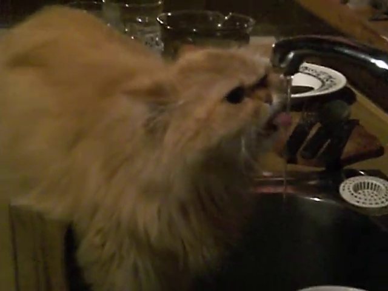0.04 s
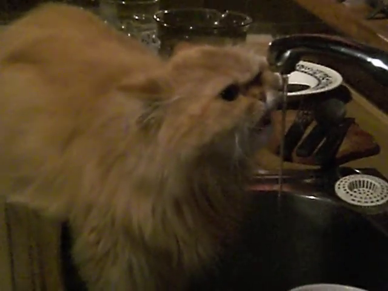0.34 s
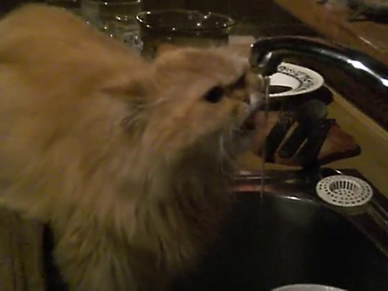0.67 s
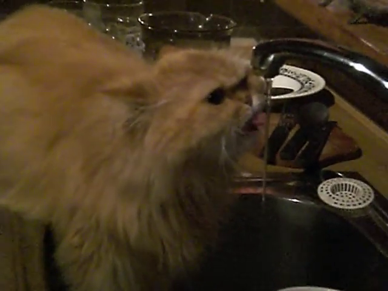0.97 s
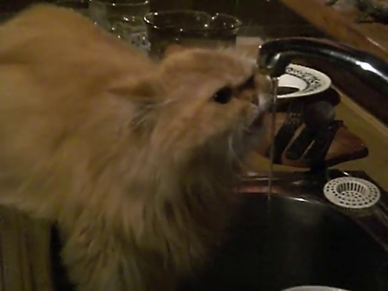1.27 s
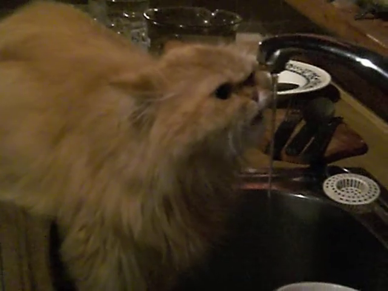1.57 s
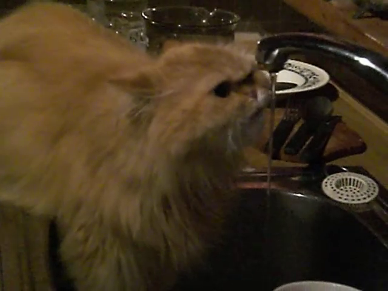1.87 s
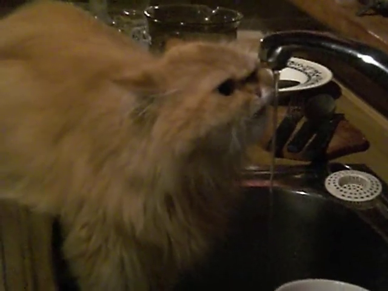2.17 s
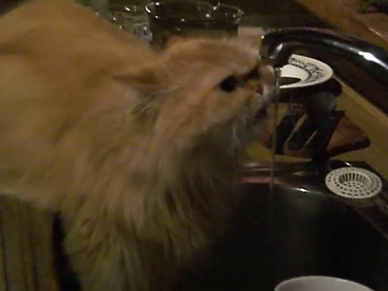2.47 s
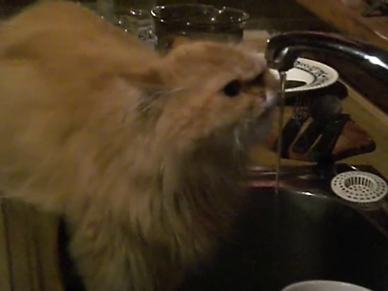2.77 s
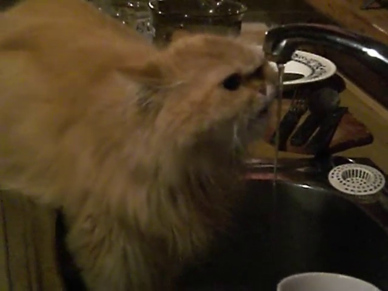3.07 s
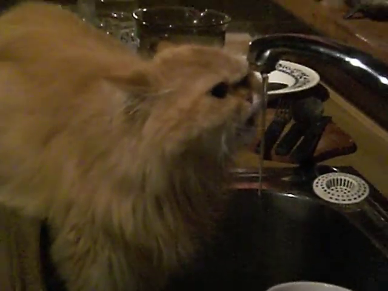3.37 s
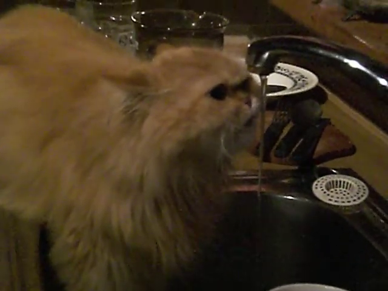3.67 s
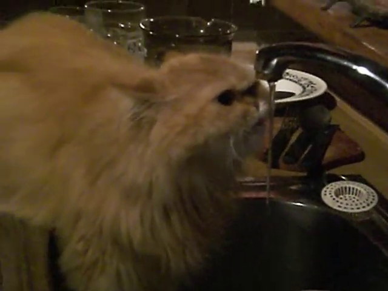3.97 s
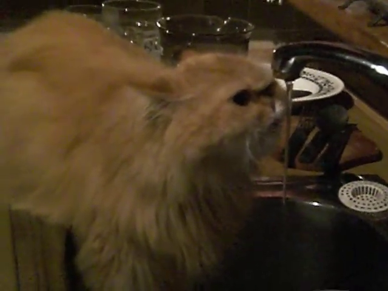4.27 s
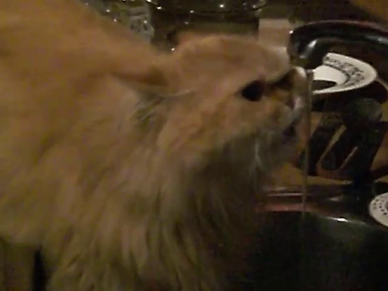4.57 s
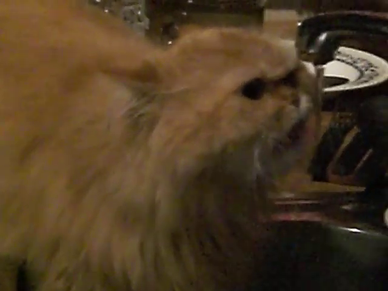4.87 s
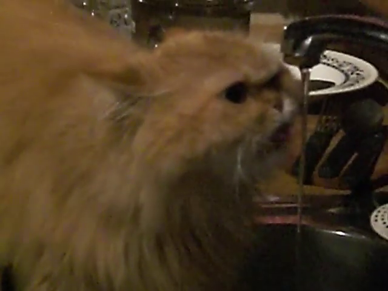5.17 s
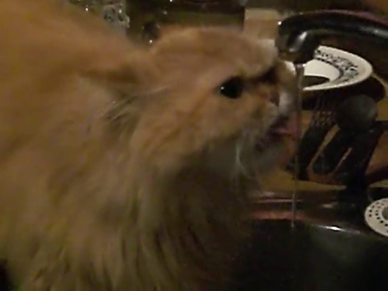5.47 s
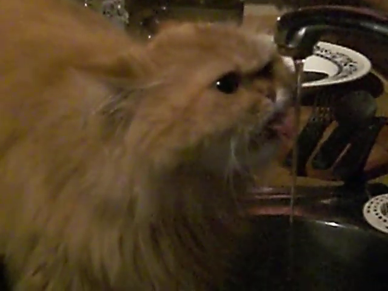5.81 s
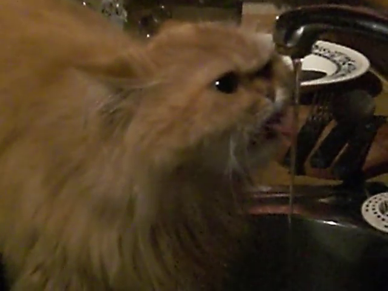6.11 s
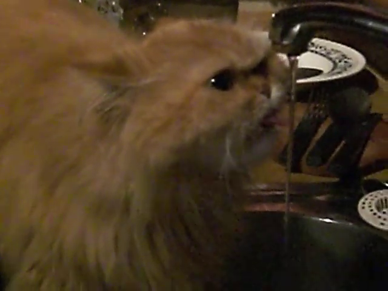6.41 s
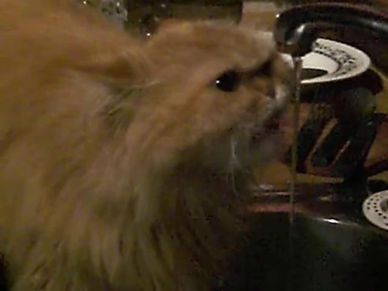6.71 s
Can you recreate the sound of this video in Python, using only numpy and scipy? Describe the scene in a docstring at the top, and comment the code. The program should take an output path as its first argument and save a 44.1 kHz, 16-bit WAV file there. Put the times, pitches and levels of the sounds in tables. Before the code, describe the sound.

A thin stream of tap water hisses into a steel sink with scattered drips, a few close clicks and a faint motor hum.

```python
"""Thin stream in a steel sink

At a kitchen sink, on a hand-held camera's microphone. The barely open tap hisses through the spout's
resonances, its stream patters on the basin and stray drops splash; a cat drinks from it unheard.
A motor hums in the room behind. Right at the microphone a finger clicks the camera, amid soft bumps."""
import sys
import numpy as np
from scipy import signal
from scipy.fft import rfft, irfft, next_fast_len
from scipy.io import wavfile
from scipy.ndimage import map_coordinates

SR = 44100
rng = np.random.default_rng(int(sys.argv[2]) if len(sys.argv) > 2 else 0)


def persist_wave(psi):
    """Save psi, clipped to +-1, as 16-bit WAV."""
    counts = np.round(np.clip(psi, -1, 1) * 32767).astype(np.int16)
    wavfile.write(sys.argv[1], SR, np.atleast_2d(counts).T)


N = 302085


def amp(db):
    """Decibels to gain."""
    return 10 ** (np.asarray(db) / 20)


def unit(x):
    """x at rms 1."""
    return x / np.sqrt(np.mean(x ** 2) + 1e-20)


def shape(points, hz):
    """Gain of (Hz, dB) points joined on a log axis."""
    point_hz, db = np.transpose(points)
    return amp(np.interp(np.log(hz + 1), np.log(point_hz), db))


def filtered(x, response):
    """x through a gain that depends on frequency."""
    size = next_fast_len(len(x) + 4096)
    return irfft(rfft(x, size) * response(np.fft.rfftfreq(size, 1 / SR)), size)[:len(x)]


def band(hz, centre_hz, width_hz):
    """Gain of one resonance."""
    return hz * width_hz / np.hypot(centre_hz ** 2 - hz ** 2, hz * width_hz)


def noise(response, size=N):
    """Coloured noise of rms 1."""
    return unit(filtered(rng.standard_normal(size), response))


def wobble(rate):
    """A smooth random curve, rate knots a second."""
    knots = rng.standard_normal(int(N * rate / SR) + 4)
    return map_coordinates(knots, [np.arange(N) * rate / SR])


def impacts(rate, scatter_db):
    """Random impulses of scattered size, rate a second, at rms 1."""
    hits = (rng.random(N) < rate / SR) * rng.choice([-1, 1], N)
    return unit(hits * amp(scatter_db * rng.standard_normal(N)))


def add(track, s, sound):
    """Mix a sound into the track at time s."""
    part = track[max(round(s * SR), 0):][:len(sound)]
    part += sound[:len(part)]


# Motor tones in the background: (frequency [Hz], level [dB])
MOTOR_TONES = [(48.5, -77), (97, -65.5), (145.8, -67), (196, -74), (294, -73.5), (343, -74), (538.5, -78)]
# The kitchen's room tone: (frequency [Hz], relative level [dB])
ROOM_TONE = [(20, -7), (45, 0), (75, 1), (100, 4.5), (160, -1), (250, -4.5), (400, -3.5), (550, -6.5),
             (1500, -11.5), (4000, -20)]


def room():
    """Behind the sink's sounds, a slightly unsteady motor hums over a low murmur of air."""
    t = np.arange(N) / SR
    hum = np.zeros(N)
    for hz, db in MOTOR_TONES:
        peak = np.sqrt(2) * amp(db + 1.16 * wobble(2.87))
        hum += peak * np.sin(2 * np.pi * hz * t + 0.33 * wobble(3.99))
    return hum + amp(-57.5) * noise(lambda hz: shape(ROOM_TONE, hz))


# Soft bumps at the microphone: (time [s], level [dB], centre [Hz], half-length [s])
SOFT_BUMPS = [(0.906, -59, 320, 0.1), (5.082, -49, 865, 0.018), (5.74, -53, 281, 0.03),
              (6.086, -57, 190, 0.035), (6.36, -55, 276, 0.022), (6.68, -51.5, 1900, .008)]


def bumps():
    """Dull contacts swell and fade without an edge."""
    out, t = np.zeros(N), np.arange(N) / SR
    for s, db, centre, half_length in SOFT_BUMPS:
        swell = amp(db) * np.exp(-((t - s) / half_length) ** 2)
        out += swell * noise(lambda hz: band(hz, centre, 0.9 * centre) ** 2)
    return out


# Modes of the plastic housing around the microphone: (frequency [Hz], relative level [dB], t60 [s])
HOUSING_MODES = [(734, -1.5, 0.015), (1105, -3, 0.018), (1580, -2, 0.005), (2240, -5.5, 0.0076),
                 (3225, -11.5, 0.0089), (4490, -4, 0.0059), (5900, -26, .006), (9600, -11.5, 0.0077)]
# Finger on the camera: (time [s], ring gain [dB], tilt [dB/octave], contact cut-off [Hz], thump [dB])
FINGER_CLICKS = [(1.4222, -27, 6.5, 3700, -29), (1.6985, -19, 4.5, 2340, -20), (4.288, -34, 6, 6950, -37),
                 (4.7485, -15.5, 0.5, 9000, -25)]


def camera_clicks():
    """A finger snaps the zoom lever; the housing rings at the microphone, with no room around it."""
    out, t = np.zeros(N), np.arange(SR // 25) / SR
    for s, ring_db, tilt_db, contact_hz, thump_db in FINGER_CLICKS:
        ring = np.zeros(len(t))
        for k, (hz, db, t60) in enumerate(HOUSING_MODES):
            # a soft fingertip spares the modes above its cut-off
            push = amp(tilt_db * np.log2(hz / 1000)) / np.hypot(1, (hz / contact_hz) ** 4)
            ring += (-1) ** k * push * amp(db - 60 * t / t60) * np.sin(2 * np.pi * hz * t)
        scrape = noise(lambda hz: band(hz, centre_hz=3000, width_hz=2500), size=len(t))
        scrape *= amp(-38.5 - 60 * t / 0.022)
        nudge = (1 - np.exp(-t / 0.002)) * amp(thump_db - 60 * t / 0.011)  # the whole body moves
        thump = nudge * np.sin(2 * np.pi * 245 * t)
        attack = 1 - np.exp(-t / 0.00013)
        add(out, s, attack * (amp(ring_db) * ring + scrape - thump))
    return out


# A splash on the sink's wet steel: (frequency [Hz], relative level [dB])
SPLASH_SPECTRUM = [(200, -9), (1100, -11.5), (2000, -9), (4000, -6.5), (8000, -7), (10500, 2.5),
                   (15800, -5)]


def drop(splash_db, bubble_hz, bubble_db):
    """A drop slaps the steel and traps a ringing bubble; the sink's walls prolong the slap."""
    t = np.arange(SR // 5) / SR
    fade = lambda t60: amp(-60 * t / t60)
    bubble_t60 = 0.033 * (9500 / bubble_hz) ** 0.4  # smaller, higher bubbles die sooner
    contact, spatter, echo = amp(-4) * fade(0.004), fade(0.68 * bubble_t60), amp(-7.5) * fade(0.24)
    slap = (contact + spatter + echo) * noise(lambda hz: shape(SPLASH_SPECTRUM, hz), size=len(t))
    # the bubble pops broadly and lingers as a narrower ring
    bubble = lambda width: noise(lambda hz: band(hz, bubble_hz, width * bubble_hz) ** 2, size=len(t))
    pop = fade(bubble_t60) * bubble(width=0.28)
    ring = amp(-6.5) * fade(3.7 * bubble_t60) * bubble(width=0.2)
    attack = 1 - np.exp(-t / 0.00028)
    return attack * (amp(splash_db) * slap + amp(bubble_db) * (pop + ring))


# Drops down in the basin: (time [s], splash level [dB], bubble pitch [Hz], bubble level [dB])
STRAY_DROPS = [(0.0596, -39.5, 10000, -33.5), (0.641, -39.5, 9600, -36.5), (0.7777, -39, 4200, -49),
               (1.3, -37, 13000, -42), (1.493, -36, 7600, -34.5), (1.5925, -36, 9500, -33),
               (1.6622, -34, 6640, -34.5), (1.703, -38, 11600, -43), (2.4132, -37.5, 9900, -35),
               (3.212, -41, 9700, -38.5), (3.9216, -35, 6300, -31), (3.9834, -35, 5360, -34.5),
               (4.045, -32.5, 14500, -27), (4.109, -43, 9200, -38), (4.8526, -39.5, 12000, -43),
               (4.9625, -34, 6100, -34), (5.4447, -38.5, 8900, -35), (5.7847, -37, 10000, -35),
               (6.117, -34.5, 14000, -27), (6.149, -41, 9000, -36.5), (6.4066, -30, 4960, -27)]
DROPLETS_PER_S, DROPLET_DB, DROPLET_HZ = 2.5, -45.5, 10300


def stray_drops():
    """Stray drops fall into the basin while faint droplets fly off at random."""
    out = np.zeros(N)
    for s, splash_db, bubble_hz, bubble_db in STRAY_DROPS:
        add(out, s, drop(splash_db, bubble_hz, bubble_db))
    count = round(DROPLETS_PER_S * N / SR)
    for when, size, pitch in rng.uniform(-1, 1, (count, 3)):
        db = DROPLET_DB + 0.5 * size
        bubble_hz = DROPLET_HZ * 2 ** (0.21 * pitch)
        add(out, abs(when) * N / SR, drop(db, bubble_hz, db))
    return out


# The steel basin drumming under the tap: (frequency [Hz], relative level [dB])
BASIN_SPECTRUM = [(150, -16.5), (320, -2), (480, -13), (600, -2), (740, -10.5), (1000, -1), (1130, 3.5),
                  (1300, -9), (1800, -5), (2300, -3.5), (4000, -18)]
# How hard the stream lands; only the swing about the mean counts: (time [s], level [dB])
STREAM_LANDING = [(0.0, -55.5), (0.19, -59.5), (0.59, -57), (1.03, -60), (1.77, -58), (2.86, -59.5),
                  (3.91, -60), (4.31, -60.5), (6.18, -57.5), (6.85, -59)]
# The stream's heaviest beads: (time [s], level [dB])
HEAVY_BEADS = [(.307, -49), (1.863, -51), (2.136, -47), (2.305, -49), (2.771, -48.5), (3.183, -50.5),
               (3.718, -48.5), (5.32, -48.5), (5.843, -49), (6.235, -48), (6.713, -49)]
PATTER_DB, PATTER_DB_PER_LANDING_DB = -59.5, 3.3
BASIN_T60_S, DRUM_VS_SPLASH_DB = 0.16, -17.5


def patter():
    """The stream breaks into beads that drum unevenly on the basin; stray drops drum on it too."""
    landing_db = np.interp(np.arange(N) / SR, *np.transpose(STREAM_LANDING))
    level_db = PATTER_DB + PATTER_DB_PER_LANDING_DB * (landing_db - landing_db.mean())
    blows = (amp(level_db) * impacts(rate=130, scatter_db=4.5)) ** 2
    t = np.arange(SR // 6) / SR
    fade = amp(-60 * t / BASIN_T60_S) ** 2  # the basin's power dies away after every blow
    power = signal.fftconvolve(blows, fade / fade.sum())[:N]
    for s, db in HEAVY_BEADS:
        add(power, s, amp(db) ** 2 * fade)
    for s, splash_db, _, _ in STRAY_DROPS:
        add(power, s, amp(splash_db + DRUM_VS_SPLASH_DB) ** 2 * fade)
    return np.sqrt(abs(power)) * noise(lambda hz: shape(BASIN_SPECTRUM, hz))


# Resonances of valve and spout, above the basin: (centre [Hz], width [Hz], relative level [dB])
SPOUT_MODES = [(2463, 101, -13.5), (2639, 108, -7.0), (2772, 49, -6.0), (2903, 96, -8.5),
               (3201, 267, -15.0), (4038, 126, -15.5), (4711, 30, -17.5), (5118, 58, -14.0),
               (5512, 131, -15.5), (6390, 330, -18.0), (7035, 78, -18.0), (8563, 30, -18.0),
               (9726, 98, -8.0), (10340, 56, -3.0), (10436, 139, -7.0), (10860, 210, -6.5),
               (11193, 86, -10.0), (11350, 330, -14.0), (11611, 330, -8.5), (11927, 216, -11.0),
               (12250, 164, -4.5), (12676, 330, -9.0), (13234, 243, -14.0), (13717, 330, -3.5),
               (13805, 48, 0.0), (14012, 330, -8.5), (14508, 30, -12.5), (14898, 181, -9.0),
               (15281, 290, -11.5), (15659, 299, -11.0)]
# Broad hiss of the jet: (frequency [Hz], relative level [dB])
JET_SPECTRUM = [(600, -16), (1400, -12), (2200, -4.5), (3600, -4.5), (4800, -4.5), (6500, -4.5), (7400, -8),
                (8400, -4), (9800, 1.5), (11500, -2), (13100, 2), (14400, 0.5), (15800, -4.5)]


def tap():
    """In the foreground, turbulence and collapsing microbubbles in the valve hiss and ring the spout."""
    def spout(hz):
        modes = (amp(db) * band(hz, centre, width) ** 2 for centre, width, db in SPOUT_MODES)
        return np.sqrt(sum(mode ** 2 for mode in modes))

    flow = amp(0.095 * wobble(5.2) + 0.71 * wobble(45) + 0.38 * wobble(400))
    fizz = lambda: flow * (rng.standard_normal(N) + amp(-4.5) * impacts(rate=2000, scatter_db=3.0))
    ring = unit(filtered(fizz(), spout))
    jet = unit(filtered(fizz(), lambda hz: shape(JET_SPECTRUM, hz)))
    return amp(-44.0) * ring + amp(-47.5) * jet


def scene():
    """One microphone at the sink feeds both channels."""
    mono = tap() + patter() + stray_drops() + camera_clicks() + bumps() + room()
    return np.array([mono, mono])


def record(dry):
    """The camera keeps nothing above its band limit."""
    top_hz = 15800
    return np.array([filtered(channel, lambda hz: hz < top_hz) for channel in dry])


dry = scene()
out = record(dry)
persist_wave(out)
```